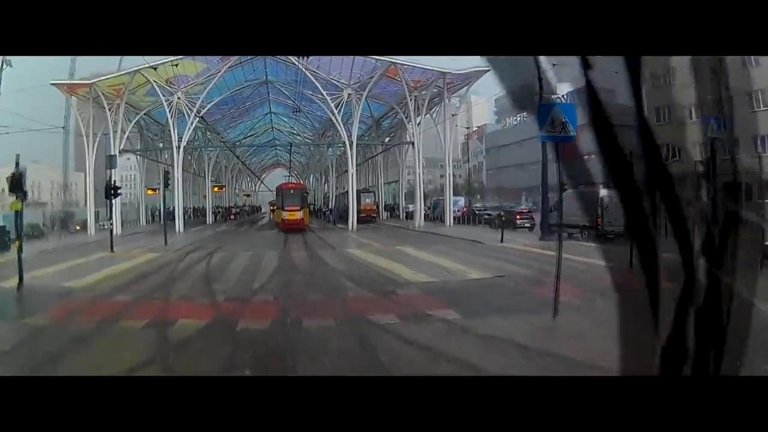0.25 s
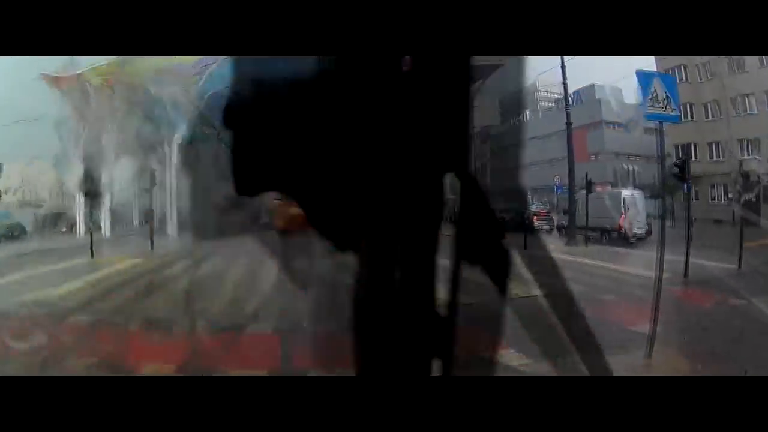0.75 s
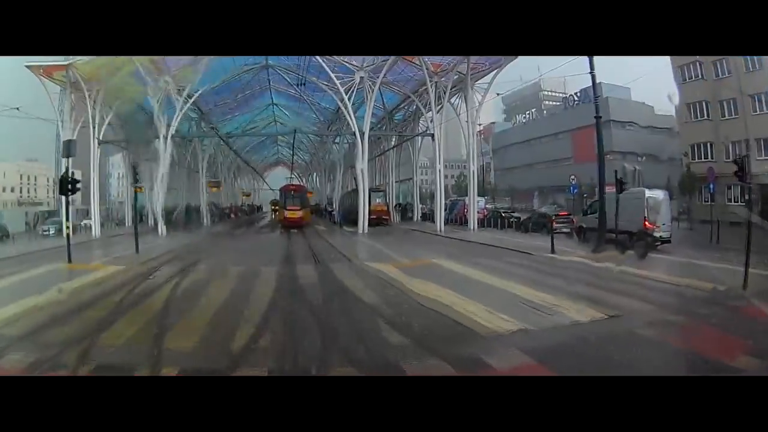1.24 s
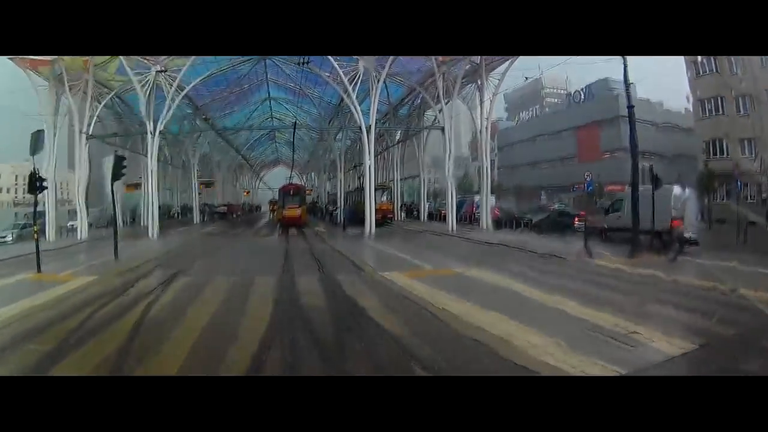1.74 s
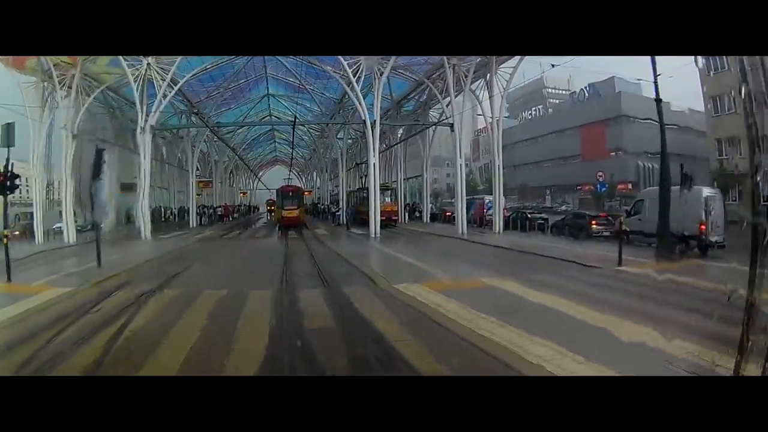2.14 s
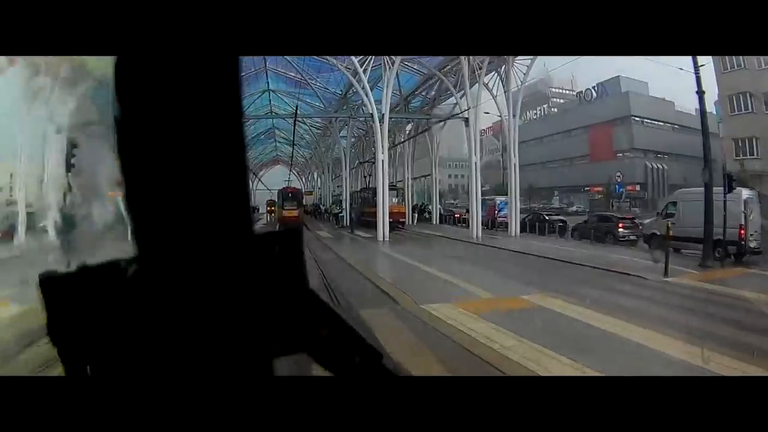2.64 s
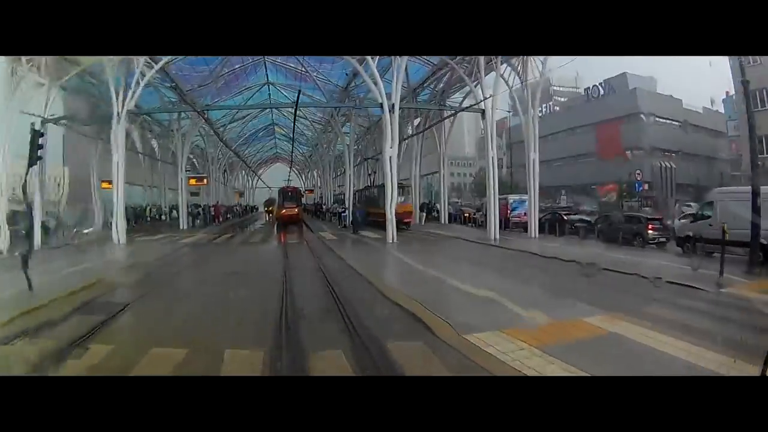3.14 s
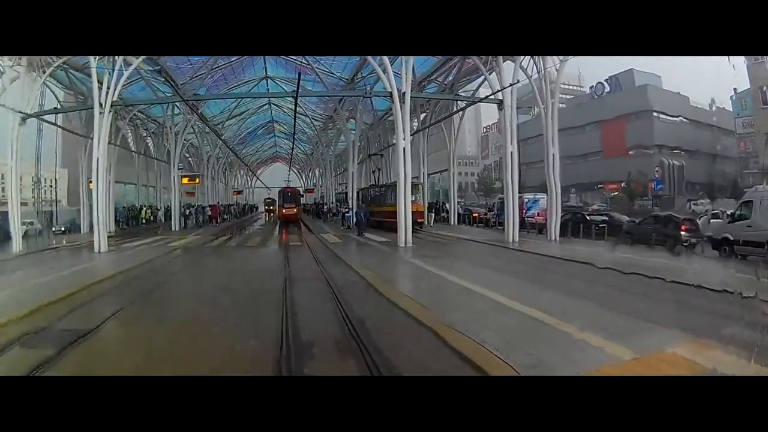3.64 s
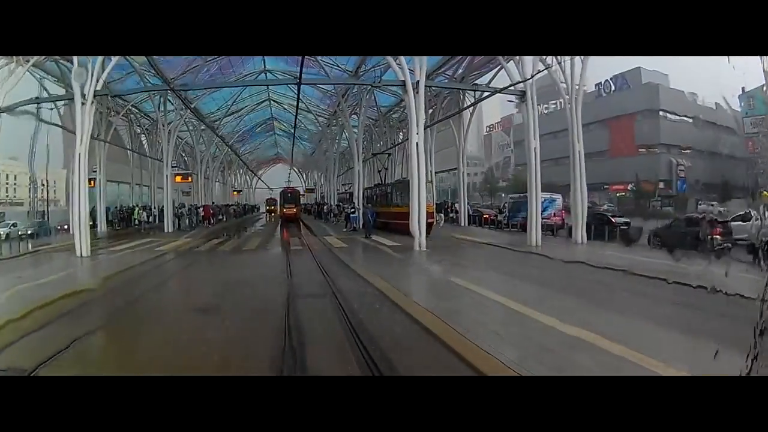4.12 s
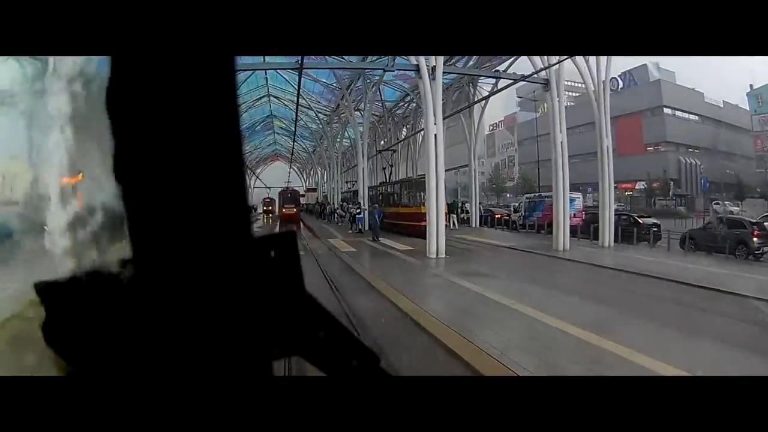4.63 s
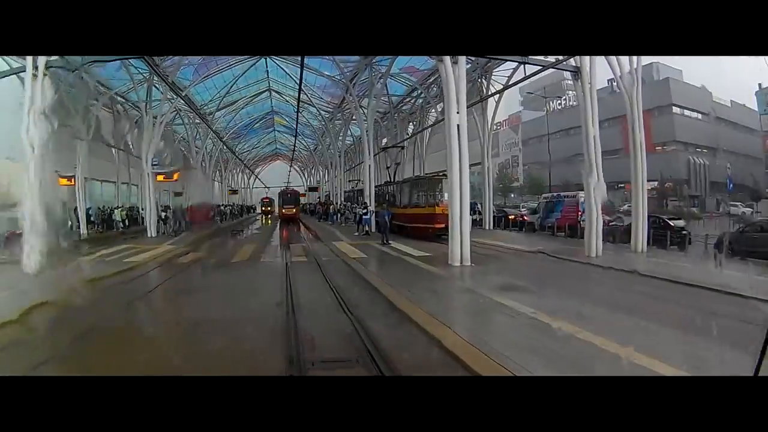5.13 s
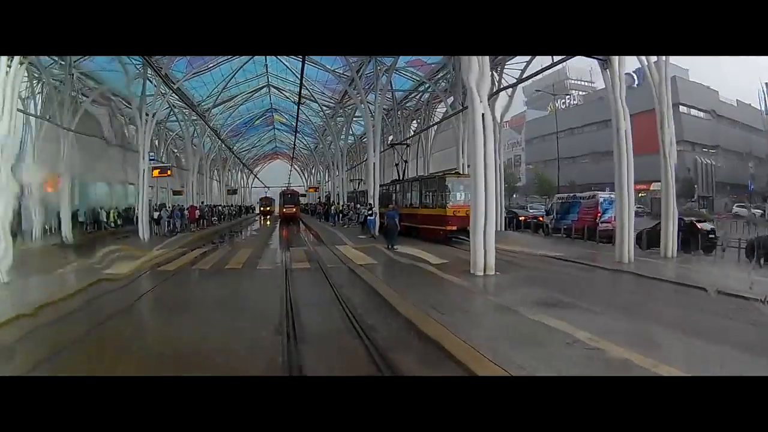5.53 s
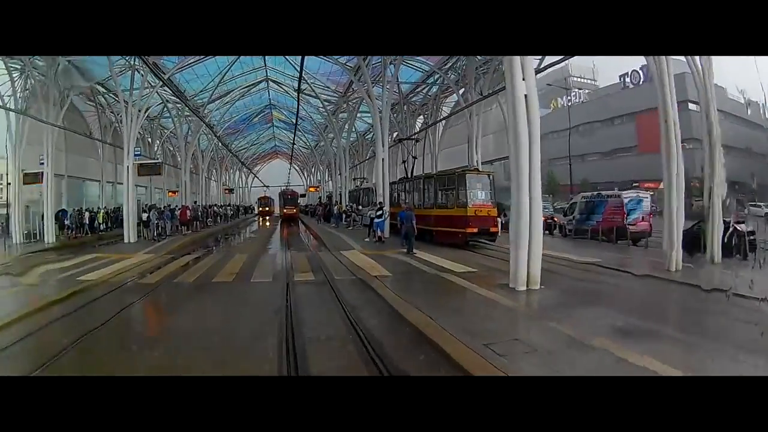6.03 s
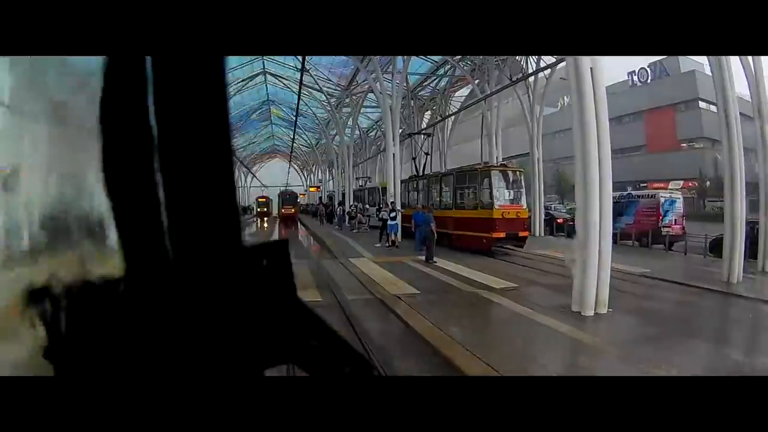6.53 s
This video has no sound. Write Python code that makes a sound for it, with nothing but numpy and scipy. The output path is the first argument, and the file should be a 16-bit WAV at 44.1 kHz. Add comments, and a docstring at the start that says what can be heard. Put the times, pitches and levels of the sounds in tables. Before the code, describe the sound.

Inside a tram cab, deep swaying rumble and wheel roar with constant loose panel rattling, faint rain hiss, slowly calming as it rolls into a stop.

```python
"""Inside the cab of a tram that rolls over a crossing in rain and slows into a roofed stop.
The body sways, rumbles and booms and the wheels roar: shaped noise under drawn levels, with swings at rail joints.
Motors, gears and a thin electronic whine waver as narrow resonances; rain and spray are hiss with decaying drops.
Loose panels rattle as noise bursts and ringing modes; trim ticks and rubber seals squeak as short wavering tones.
The small microphone overloads on the upward swings of the sway."""
import sys
import numpy as np
from scipy import signal
from scipy.fft import rfft, irfft
from scipy.io import wavfile
from scipy.ndimage import uniform_filter1d

SR = 44100
rng = np.random.default_rng(int(sys.argv[2]) if len(sys.argv) > 2 else 0)


def unload_audio(sound):
    """Save the sound as a 16-bit wav file, at the path given as the first command line argument."""
    columns = np.transpose(np.atleast_2d(sound))
    # keep every value between -1 and 1, then stretch to whole-number steps
    steps = np.round(np.clip(columns, -1, 1) * 32767)
    wavfile.write(sys.argv[1], SR, steps.astype(np.int16))


N = 298557
TIME = np.arange(N) / SR  # seconds

# Bright part of rattles and tick snaps. Each row: frequency in Hz, relative density in dB per Hz.
RATTLE_TREBLE = [(4000, -3.5), (6000, -3.5), (9000, -13.5), (11500, -10), (15500, -27)]


def amp(db):
    """Turn decibels into an amplitude factor."""
    return 10 ** (np.asarray(db) / 20)


def evened(x):
    """Scale to an RMS of one."""
    return x / np.sqrt(np.mean(x ** 2) + 1e-20)


def read_spectrum(points, hz):
    """Read a spectrum in dB between its points, along a logarithmic frequency axis."""
    point_hz, level_db = np.transpose(points)
    return np.interp(np.log(hz + 1), np.log(point_hz + 1), level_db, left=-100, right=-100)


def ride(axis, surge=None):
    """Gain of one layer over the ride, raised or dipped by bell-shaped surges if a surge column is given."""
    # Layer levels before the cab's resonances. Each row: time in seconds, sway in dB, bogie rumble in dB,
    # floor boom in dB, wheel roar in dB, rain hiss in dB.
    ride_levels = np.array([(0, -27, -25.5, -26.5, -33, -49.5), (.55, -27.5, -30, -29, -36.5, -56.5),
                            (1.0, -26.5, -25.5, -27.5, -37, -56), (1.45, -21.5, -25, -29.5, -37, -52),
                            (1.9, -30, -28, -27.5, -35.5, -56.5), (2.15, -25.5, -30.5, -31.5, -39.5, -56.5),
                            (2.5, -31, -29.5, -33, -38, -56), (3.0, -29.5, -29, -33, -36.5, -56),
                            (3.65, -28, -33, -31.5, -37.5, -56.5), (4.0, -33.5, -43, -38.5, -36.5, -57),
                            (4.2, -33, -32.5, -34, -36.5, -56.5), (5.0, -28.5, -40, -37, -35.5, -56.5),
                            (5.95, -33, -32.5, -34.5, -35.5, -57), (6.12, -35, -43, -37, -35, -54.5),
                            (6.77, -38, -41, -32.5, -34, -58)])
    # Wheels crossing points and rough rail. Each row: centre in seconds, half length in seconds,
    # rise of the boom in dB, rise of the roar in dB.
    surge_table = [(0.023, 0.026, 3.5, 3), (0.305, 0.053, 4, 7.5), (0.735, 0.11, 2.5, 1.5),
                   (0.994, .05, 5, 2), (1.114, 0.029, 5.5, 1), (1.274, 0.098, 4, 6), (1.599, 0.09, 4.5, 7),
                   (1.747, 0.074, 2, 5.5), (2.24, 0.11, 3, 3.5), (2.775, .05, 5.5, 0.5),
                   (3.046, 0.04, 4.5, -1), (3.21, 0.074, 4, 0), (3.625, 0.031, -0.5, 2.5),
                   (5.466, 0.039, 6, 2), (6.006, 0.033, 2.5, 1), (6.36, 0.095, 5, 1.5)]
    t = TIME[::100]
    rise_db = 0
    if surge is not None:
        rise_db = sum(row[surge] * np.exp(-((t - row[0]) / row[1]) ** 2) for row in surge_table)
    level_db = np.interp(t, ride_levels[:, 0], ride_levels[:, axis])
    return np.interp(TIME, t, amp(level_db + rise_db))


def noise(spectrum, patchy_db, flicker_db, size):
    """Random short-time spectra with drifting patches and a flicker shared by all bands, at an RMS of one."""
    frames, hz = N * 4 // size + 5, np.fft.rfftfreq(size, 1 / SR)
    real, imaginary, patches = rng.standard_normal((frames, len(hz), 3)).T
    patches = uniform_filter1d(patches, size=6, axis=0)  # blur over frequency
    patches = evened(uniform_filter1d(patches, size=8, axis=1))  # blur over time
    flicker = evened(uniform_filter1d(rng.standard_normal(frames), size=3))
    level_db = read_spectrum(spectrum, hz)[:, None] + patchy_db * patches + flicker_db * flicker
    frames_of_sound = (real + 1j * imaginary) * amp(level_db)
    return evened(signal.istft(frames_of_sound, nperseg=size, noverlap=size * 3 // 4)[1][:N])


def whistle(hz, width):
    """A wavering tone: noise through a narrow resonance applied twice, at an RMS of one."""
    r = np.exp(-np.pi * width / SR)
    slow = rng.standard_normal(N) + 1j * rng.standard_normal(N)
    for _ in range(2):
        slow = signal.lfilter([1 - r], [1, -r], slow)
    return evened((slow * np.exp(2j * np.pi * hz * TIME)).real)  # shift up to pitch


def add(mix, s, sound):
    """Mix a short sound in at s seconds, cut at the end of the scene."""
    start = max(round(s * SR), 0)
    part = mix[start:][:len(sound)]
    part += sound[:len(part)]


def bumps(table):
    """Gain over frequency from bell-shaped peaks and dips."""
    hz = np.fft.rfftfreq(N, 1 / SR)
    return amp(sum(db * np.exp(-((hz - f) / width * 2) ** 2) for f, width, db in table))


def body():
    """The car body sways on its springs, swings after rail joints and booms through the floor."""
    # Three spectra. Each row: frequency in Hz, relative density in dB per Hz.
    sway_spectrum = [(10, -30), (14, -1), (19, -6), (25, -9), (38, 0.5), (46, -0.5), (58, -34)]
    rumble_spectrum = [(36, -62), (46, 10), (60, -2.5), (70, -2), (88, -9), (100, -9), (125, -21)]
    boom_spectrum = [(56, -17.5), (95, -4.5), (119, -0.5), (146, -1.5), (172, -2), (211, -4), (285, -13.5),
                     (324, -14.5), (416, -15), (480, -24), (620, -19.5), (1060, -120)]
    # Rail joints that set the body swinging. Each row: highest crest in seconds, height in dB,
    # swing rate in Hz, half length in seconds.
    jolt_table = [(0.045, -20.5, 17, 0.05), (0.175, -22.1, 17, 0.17), (0.197, -18.7, 19.8, 0.17),
                  (0.279, -21.7, 34, 0.12), (0.537, -16.5, 19.1, 0.12), (0.973, -25.1, 20.5, 0.17),
                  (1.011, -23, 42, 0.08), (1.147, -21.0, 17, 0.17), (1.263, -21.0, 38, 0.08),
                  (1.41, -13.3, 18.4, 0.16), (1.662, -19.4, 17.7, 0.08), (1.712, -21.8, 38, 0.12),
                  (1.971, -15.7, 18.4, 0.17), (2.224, -19.3, 38, 0.12), (2.834, -20.7, 19.1, 0.17),
                  (3.8, -22.2, 17.7, 0.17), (4.689, -25.6, 17.7, 0.17), (5.413, -20.2, 28, 0.05)]
    sway = ride(axis=1) * noise(sway_spectrum, patchy_db=-1.1, flicker_db=1.06, size=16384)
    for s, db, hz, half in jolt_table:
        t = TIME[max(round((s - .5) * SR), 0):round((s + .5) * SR)] - s
        swing = amp(db) * np.cos(2 * np.pi * hz * t) * np.exp(-(t / half) ** 2)
        add(sway, s + t[0], swing)
    rumble = noise(rumble_spectrum, patchy_db=2.5, flicker_db=3.0, size=4096)
    # steady rolling partly evens out the slow lumps
    steady = rumble / uniform_filter1d(rumble ** 2, size=4000) ** 0.34
    boom = noise(boom_spectrum, patchy_db=.5, flicker_db=0.8, size=2048)
    return sway + ride(axis=2) * evened(steady) + ride(axis=3, surge=2) * boom


def wheels():
    """Rolling roar as surging noise, with wavering motor and gear tones and a thin electronic whine, all fading."""
    # Wheel roar. Each row: frequency in Hz, relative density in dB per Hz.
    roar_spectrum = [(150, -34), (220, -3), (300, -8.5), (400, -6), (500, -2), (600, -4.5), (750, -7.5),
                     (1000, -9), (1250, -15), (1600, -21), (2000, -31.5), (2600, -34.5), (3400, -52),
                     (5700, -100)]
    # Pitches of the motor and gear tones, the last an electronic whine, in Hz.
    tone_pitches = [475, 1564, 3077, 3167, 4564, 13355]
    # The same tones. Each row: resonance width in Hz, level at the start in dB, fade in dB per second.
    tone_table = [(40.5, -56, -2.7), (18, -67, -1), (20, -87, -7), (20, -65, -3.5), (25, -73, -8),
                  (5, -92, -1)]
    tones = sum(amp(db + fade_db * TIME) * whistle(hz, width)
                for hz, (width, db, fade_db) in zip(tone_pitches, tone_table))
    roar = noise(roar_spectrum, patchy_db=1.15, flicker_db=0.73, size=1024)
    return ride(axis=4, surge=3) * roar + tones


def rain():
    """A patchy hiss with larger drops on the windscreen, each a short decaying burst of noise."""
    # Rain and spray. Each row: frequency in Hz, relative density in dB per Hz.
    hiss_spectrum = [(1200, 7.5), (2000, -3.5), (2900, -2), (3650, 1), (4300, -9), (5800, -10.5),
                     (7000, -18), (10500, -18.5), (15500, -25.5)]
    drops_per_s, decay_s = 300, 0.00093
    hiss = noise(hiss_spectrum, patchy_db=1.5, flicker_db=1.5, size=256)
    drop_sizes = amp(2.9 * np.minimum(rng.exponential(1, N), 5))
    drops = drop_sizes * (rng.random(N) < drops_per_s / SR)
    decaying = signal.lfilter([1], [1, -np.exp(-1 / (decay_s * SR))], drops)
    patter = decaying * noise(hiss_spectrum, patchy_db=0.0, flicker_db=-7.5, size=256)
    return ride(axis=5) * (hiss + amp(-12.5) * evened(patter))


def rattles():
    """Each shake is a dying burst of noise that also rings the panel modes; the treble rises fastest."""
    # Loose panels shaken. Each row: start in seconds, nominal level in dB (trimmed below),
    # treble in dB against that level (trimmed below).
    shake_table = [(0.0648, -52, -21), (0.1096, -40, -42), (0.1406, -39.5, -36), (0.2144, -42, -26),
                   (0.2503, -39.5, -24), (0.2954, -43, -25), (0.3117, -45, -30), (0.3755, -41, -34),
                   (0.4075, -42, -32), (0.5676, -39, -30), (0.687, -37.5, -27), (0.7208, -39.5, -24),
                   (0.7532, -43, -29), (0.8165, -41, -36), (0.8784, -45.5, -28), (1.004, -48, -21),
                   (1.0164, -51, -12), (1.094, -50, -26), (1.143, -40, -27), (1.2156, -47, -29),
                   (1.2695, -39.5, -23), (1.4202, -42, -39), (1.4696, -47, -37), (1.5514, -44, -18),
                   (1.596, -39, -26), (1.633, -36, -36), (1.717, -40, -27), (1.7724, -47, -26),
                   (1.8158, -37.5, -26), (1.8731, -38.5, -26), (1.9026, -39.5, -29), (1.996, -36, -27),
                   (2.1869, -42, -25), (2.2404, -42.5, -16), (2.2857, -47, -16), (2.3336, -46.5, -16),
                   (2.4114, -49, -32), (2.6035, -49, -32), (2.634, -38, -28), (2.7044, -42.5, -26),
                   (2.7382, -40.5, -25), (2.8449, -45, -22), (2.9264, -49, -21), (2.9701, -46.5, -22),
                   (3.0644, -49.5, -16), (3.2264, -48, -17), (3.2715, -46, -20), (3.3244, -56, -10),
                   (3.4211, -50, -26), (3.5518, -43, -34), (3.6204, -50, -17), (3.77, -46, -12.5),
                   (3.8354, -48, -15), (3.912, -54, -17), (3.9664, -45, -17.5), (4.0677, -59, -9),
                   (4.2464, -45.5, -16.5), (4.4742, -44, -31), (4.5446, -43.5, -15.5), (4.615, -49, -15),
                   (4.719, -46.5, -14), (5.015, -43.5, -20), (5.057, -43, -18), (5.1053, -52, -22),
                   (5.2026, -47.5, -19), (5.3787, -49.5, -10), (5.4445, -41, -21), (5.496, -45.5, -12),
                   (5.7239, -45, -19), (5.884, -48, -12), (5.9773, -53, -14), (6.081, -48, -11.5),
                   (6.1779, -49, -11), (6.2367, -56, -10), (6.2856, -48, -17), (6.3834, -48, -16),
                   (6.4702, -45.5, -11), (6.545, -48, -10.5), (6.6363, -53, -12)]
    # Low part of the rattle. Each row: frequency in Hz, relative density in dB per Hz.
    low_spectrum = [(1300, 4.5), (2200, 0.5), (2900, 1.5), (3650, 3), (4400, -11), (6000, -15.5),
                    (7500, -52)]
    # Pitches of the panel modes in Hz.
    mode_pitches = [1572, 2780, 3165, 3495, 3705]
    # The same modes. Each row: resonance width in Hz, level in dB against the shake's slowed envelope.
    mode_table = [(35, -4), (60, -13), (50, -24), (90, -11.5), (70, -18)]
    t60_s, faint_per_s = 0.19, 4
    low, treble, t = np.zeros(N), np.zeros(N), TIME[:SR // 2]
    # faint shakes at random moments
    when, size = rng.random((round(faint_per_s * N / SR), 2)).T
    faint = [(s * N / SR, -52 + 9.5 * (2 * z - 1), -20) for s, z in zip(when, size)]
    for s, db, treble_db in shake_table + faint:
        fall = amp(db - 60 * t / t60_s)
        # squared envelopes, so that overlapping shakes add as power
        add(low, s, (amp(-6) * fall * (1 - np.exp(-t / 0.0025))) ** 2)
        add(treble, s, (amp(treble_db + 4.5) * fall * (1 - np.exp(-t / 0.00031))) ** 2)
    ring = sum(amp(db) * whistle(hz, width) for hz, (width, db) in zip(mode_pitches, mode_table))
    lingering = signal.lfilter([.0015], [1, .0015 - 1], low)  # modes outlast the blows
    ringing = np.sqrt(abs(lingering)) * ring
    low_rattle = np.sqrt(low) * noise(low_spectrum, patchy_db=1.0, flicker_db=0.5, size=128)
    bright_rattle = np.sqrt(treble) * noise(RATTLE_TREBLE, patchy_db=3.0, flicker_db=-0.5, size=128)
    return low_rattle + ringing + bright_rattle


def ticks():
    """A tone swells to its crest and dies, the shortest with a bright snap; an inverted reflection follows."""
    # Ticks of plastic trim and short squeaks of rubber seals. Each row: start in seconds,
    # crest of the tone's envelope in dB before the reflection, pitch in Hz, time to the crest in seconds.
    tick_table = [(0.106, -50, 1570, 0.0075), (.167, -42, 2690, 0.003), (.359, -53, 5700, .001),
                  (1.216, -36, 3400, 0.00023), (1.27, -36, 3400, 0.00017), (1.48, -49, 5000, 0.00016),
                  (1.552, -57, 7100, 0.00085), (2.2857, -36, 3580, .0002), (2.708, -48, 1550, 0.0086),
                  (2.742, -45, 1550, 0.01), (2.602, -48.5, 3680, .002), (2.737, -50, 3680, 0.005),
                  (3.592, -36, 531, 0.011), (3.598, -33, 704, 0.0041), (3.635, -32, 540, 0.0073),
                  (3.8332, -16.5, 1500, 0.000053), (4.2424, -31, 3700, 0.00029),
                  (4.2645, -39.5, 1750, 0.00096), (4.3204, -48, 3640, .0002), (4.5441, -46, 5000, 0.00016),
                  (5.4495, -40, 2420, .0003), (6.1779, -43, 3390, .0002), (6.2362, -41, 3500, .0003),
                  (6.6365, -39, 3600, 0.00032)]
    phase_drift, snap_s = 14, .0015  # radians per root second, seconds
    tones, snaps, t = np.zeros(N), np.zeros(N), TIME[:SR // 4]
    for s, db, hz, crest in tick_table:
        waver = phase_drift * np.cumsum(rng.standard_normal(len(t))) / np.sqrt(SR)
        swell = t / crest * np.exp(1 - t / crest)
        add(tones, s, amp(db) * np.sin(2 * np.pi * hz * t + waver) * swell)
        add(snaps, s, amp(db - 31.0) * np.exp(-crest / snap_s - t / snap_s))  # weaker for slow crests
    direct = tones + snaps * noise(RATTLE_TREBLE, patchy_db=0, flicker_db=0, size=128)
    return direct - amp(-7) * np.roll(direct, round(0.002 * SR))


def scene():
    """Everything sounds through the standing waves of the cab, which lift and dip narrow bands."""
    # Standing waves at the microphone. Each row: frequency in Hz, bell width in Hz, gain in dB.
    cab_modes = [(58, 12, -2.5), (69, 12, -6), (93, 14, 2), (113, 16, 2), (155, 26, -4), (222, 14, 2),
                 (241, 18, -4), (260, 12, 2), (282, 22, -4), (335, 20, 3), (415, 24, -4), (478, 40, 2),
                 (620, 24, -6), (670, 60, -2), (720, 50, -3), (1420, 120, -3), (3010, 60, -3),
                 (3680, 260, 2)]
    sources = body() + wheels() + rain() + rattles() + ticks()
    return irfft(rfft(sources) * bumps(cab_modes), N)[None]


def record(dry):
    """Housing notches, overload on positive swings, a coupling capacitor that lets flat tops sag, hiss, band limit."""
    # Microphone housing. Each row: frequency in Hz, bell width in Hz, gain in dB.
    housing_notches = [(8000, 650, -18), (12700, 830, -13), (13750, 770, -8)]
    ceiling_db, coupling_s = -15.2, .0107
    self_noise_db, edge_hz = -82.5, 15780
    housed = irfft(rfft(dry) * bumps(housing_notches), N)
    overloaded = np.minimum(housed, amp(ceiling_db))
    leak = np.exp(-1 / (coupling_s * SR))
    coupled = signal.lfilter([1, -1], [1, -leak], overloaded)
    hissing = coupled + amp(self_noise_db) * rng.standard_normal(dry.shape)
    band_limit = signal.firwin(511, edge_hz, window=("kaiser", 9), fs=SR)
    return signal.oaconvolve(hissing, band_limit[None], "same")


dry = scene()
out = record(dry)
unload_audio(out)
```